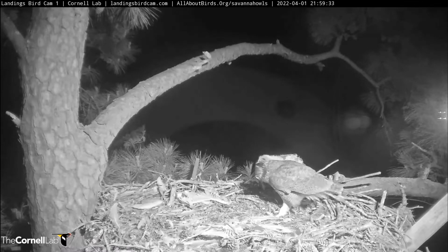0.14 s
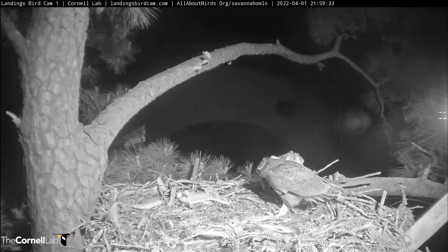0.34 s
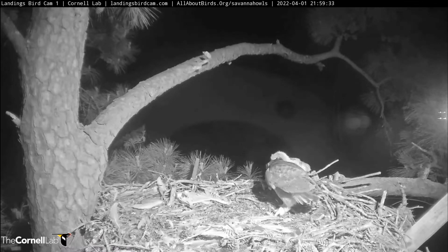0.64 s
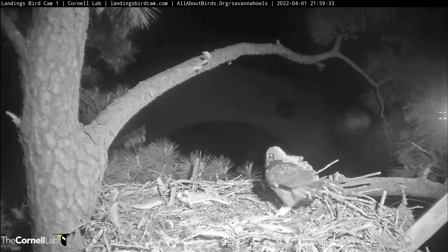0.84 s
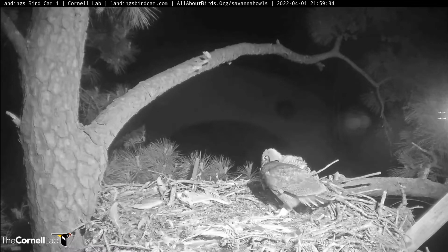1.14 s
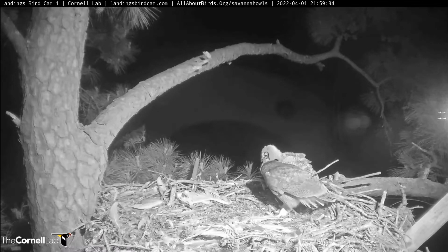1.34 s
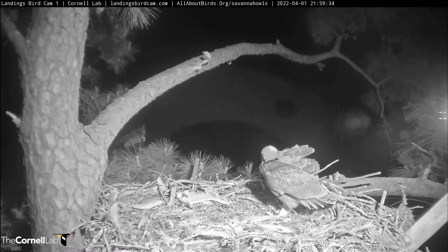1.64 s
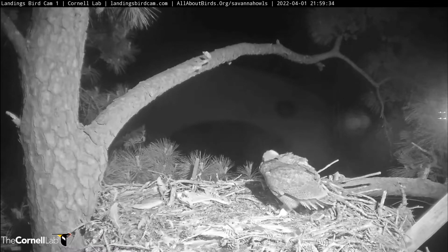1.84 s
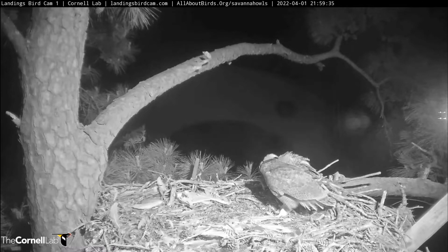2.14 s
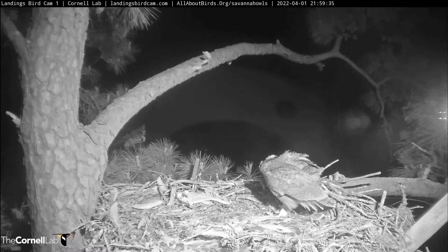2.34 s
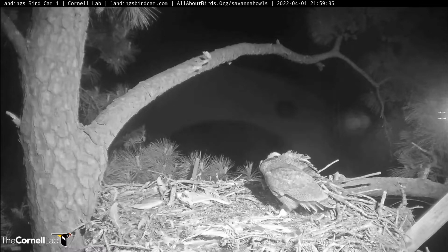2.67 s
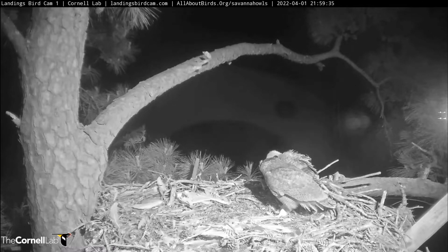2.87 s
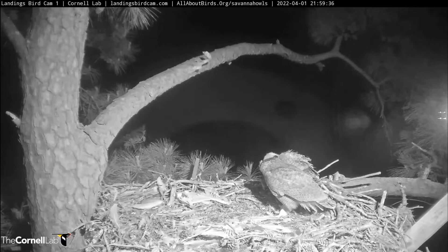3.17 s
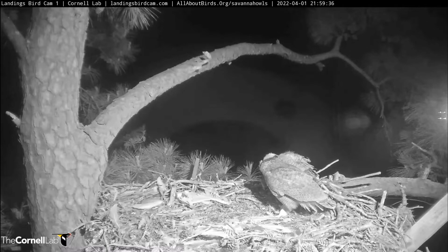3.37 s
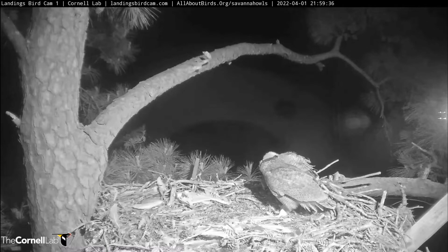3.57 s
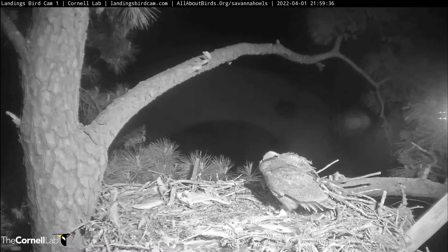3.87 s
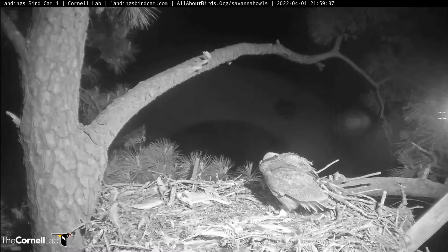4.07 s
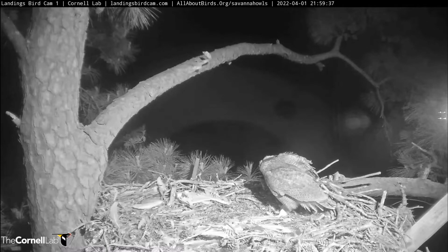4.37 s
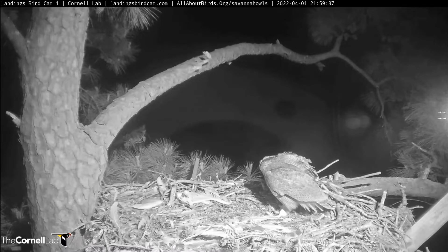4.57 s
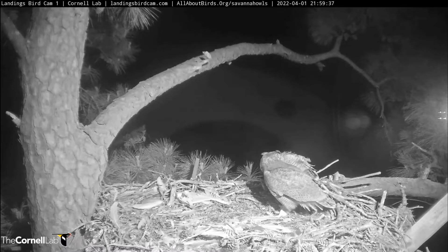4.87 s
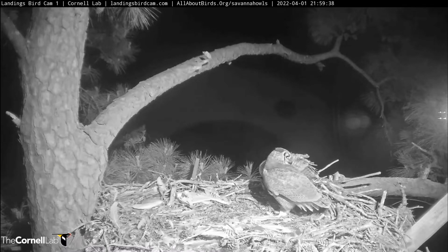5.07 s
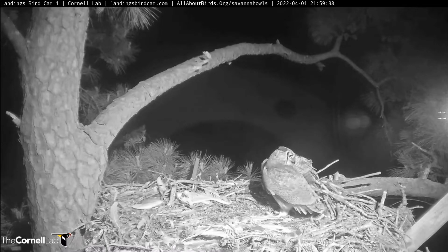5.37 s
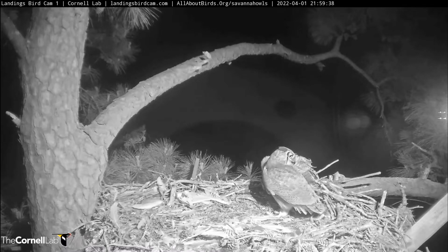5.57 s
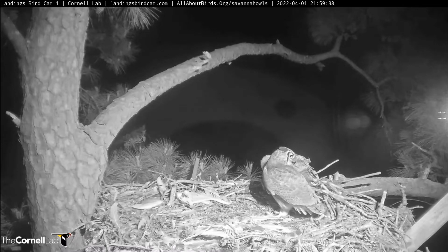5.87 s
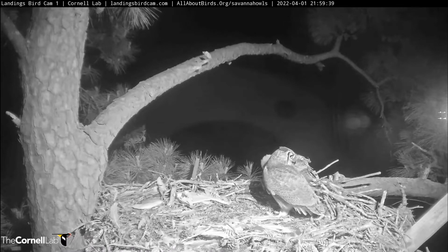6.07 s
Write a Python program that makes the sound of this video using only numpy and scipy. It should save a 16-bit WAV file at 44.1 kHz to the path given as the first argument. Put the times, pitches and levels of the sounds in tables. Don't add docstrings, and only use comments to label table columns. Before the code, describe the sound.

Three short, raspy begging screeches from a young owl, several seconds of quiet apart, over dim frog chorus, thin motor whine and electrical hum.

```python
import sys
import numpy as np
from scipy import signal
from scipy.fft import rfft, irfft
from scipy.io import wavfile
from scipy.ndimage import uniform_filter1d

SR = 44100
rng = np.random.default_rng(int(sys.argv[2]) if len(sys.argv) > 2 else 0)


def boost_factor(decibels):
    exponent = np.asarray(decibels, float) / 20
    return 10 ** exponent


def store_wav(level_fs):
    pcm = np.round(np.clip(np.atleast_2d(level_fs), -1, 1) * 32767)
    wavfile.write(sys.argv[1], SR, pcm.T.astype(np.int16))


N = 273861
BEAT_PEAK_S = 2.45


def rms_one(x):
    return x / np.sqrt(np.mean(np.abs(x) ** 2) + 1e-20)


def in_time(rows):
    s, *columns = np.transpose(rows)
    return [np.interp(np.arange(N) / SR, s, c) for c in columns]


def drift(rate_hz):
    r = np.exp(-2 * np.pi * rate_hz / SR)
    noise = rng.standard_normal(N + SR)
    return rms_one(signal.lfilter([1], [1, -2 * r, r * r], noise)[SR:])


def wobble(rate_hz):
    return rms_one(drift(rate_hz) + 1j * drift(rate_hz))


def coloured(spectrum):
    hz, level_db = np.transpose(spectrum)
    bins_hz = np.maximum(np.fft.rfftfreq(N, 1 / SR), 1)
    gain = boost_factor(np.interp(np.log(bins_hz), np.log(hz), level_db, right=-120))
    return rms_one(irfft(gain * rfft(rng.standard_normal(N)), N))


def ring(clicks, hz, t60):
    r, w = boost_factor(-60 / (t60 * SR)), 2 * np.pi * hz / SR
    return signal.lfilter([0, np.sin(w)], [1, -2 * r * np.cos(w), r * r], clicks + 1e-18)


def struck(events, t60):
    out = np.zeros(N)
    for s, peak_db, hz in events:
        click = np.zeros(SR // 5)
        click[0] = boost_factor(peak_db)
        at = round(s * SR)
        out[at:at + len(click)] += ring(click, hz, t60)
    return out


def turns(hz):
    return 2 * np.pi * np.cumsum(hz) / SR


def fade_depth(start, end, attack_s, release_s):
    t = np.arange(N) / SR
    return np.clip(np.maximum(1 - (t - start) / attack_s, 1 - (end - t) / release_s), 0, 1)


def owl():
    # [start/s, end of low whistle/s, its level/dB, breathy share at start/0-1,
    # hoarseness when whistle and hiss balance/0-1]
    calls = [
        (0.774, 1.252, -44, .2, 0.26),
        (3.375, 3.826, -41.5, 0.54, 0.58),
        (6.078, 6.26, -39.5, 0.98, .7),
    ]
    # [t/s, f/Hz]
    low_pitch = [
        [(.8, 946.7), (.824, 1075), (.864, 1143), (1.068, 1216), (1.162, 1254), (1.192, 1106), (1.214, 1044),
         (1.25, 1038)],
        [(3.396, 907), (3.426, 980), (3.486, 1049), (3.624, 1073), (3.77, 1045), (3.798, 1012), (3.824, 948.3)],
        [(6.083, 940), (6.14, 955), (6.185, 1030), (6.21, 1045)],
    ]
    # [t/s, f/Hz, breath effort/dB, whistle against hiss/dB]
    high_voice = [
        [(.777, 2240, -47, 16.5), (.787, 2786, -46.5, 8), (.808, 3346, -46, -1.5), (.88, 3404, -48, -2.5),
         (1.0, 3258, -42.5, 8.5), (1.05, 3333, -44.5, 8), (1.09, 3805, -46.5, -2), (1.168, 3930, -48.5, 0),
         (1.245, 2610, -53, -6)],
        [(3.378, 2270, -48.5, 17), (3.39, 2836, -47.5, -11), (3.41, 3620, -46.5, -8), (3.45, 4020, -49.5, -8),
         (3.54, 4012, -53, -20), (3.65, 3930, -48, 1), (3.793, 3800, -50.5, -1), (3.818, 2780, -47, 7),
         (3.85, 2150, -55, 6)],
        [(6.08, 2950, -55.5, -11), (6.13, 2890, -55, -5.5), (6.148, 2857, -52, 1), (6.165, 3488, -52.5, -18),
         (6.24, 3520, -58, -5)],
    ]
    air = rasp()
    return strands() + sum(screech(*rows, air) for rows in zip(calls, low_pitch, high_voice))


def screech(call, low_rows, high_rows, air):
    start, low_end, level_db, breathy, hoarse = call
    high_end = high_rows[-1][0]
    low_hz, = in_time(low_rows)
    high_hz, effort_db, whistle_db = in_time(high_rows)
    t = np.arange(N) / SR
    since = t - start
    sounding = 1 - fade_depth(start - .002, max(low_end, high_end) + .006, .004, .004)

    low_fade = fade_depth(start, low_end, attack_s=.017 + .059 * breathy, release_s=.029)
    crop_db = -.0495 * np.maximum(low_hz - 1110, 0)
    falling = uniform_filter1d(np.maximum(-np.gradient(low_hz) * SR / 1000, 0), size=400)
    low_db = level_db - 9 * since - 19 * low_fade + crop_db - falling
    low_phase = turns(low_hz + 9.2 * drift(53))
    unsettled = .12 + breathy * np.exp(-(np.maximum(since, 0) / .054) ** 2) + .1 * falling
    steady = np.sqrt(1 - np.minimum(unsettled, 1) ** 2)
    low = (steady + unsettled * wobble(120)) * np.exp(1j * low_phase)
    low = np.sqrt(2) * boost_factor(low_db) * np.real(low + boost_factor(-28) * low ** 2)

    pop_s, rise_s, decay_s = .7848, .0022, .0045
    pop = np.exp(-np.abs(t - pop_s) / np.where(t < pop_s, rise_s, decay_s))
    high_fade = fade_depth(start, high_end, attack_s=.007, release_s=.022)
    upper_db = effort_db + 14.5 * pop - 15.5 * high_fade

    hoarse = np.clip(hoarse + .03 * whistle_db, 0, 1)
    high_phase = turns(high_hz + 38 * drift(55))
    high = (np.sqrt(1 - hoarse ** 2) + hoarse * wobble(150)) * np.exp(1j * high_phase)
    high = high * boost_factor(1.8 * drift(45) - .4)

    beak_db = -.012 * np.maximum(high_hz + low_hz - 4530, 0)
    sum_db = -14 - .16 * whistle_db + beak_db
    difference_db = np.minimum(-16.5 - 1.1129 * whistle_db, -4)
    blur = rms_one(1 + .7 * wobble(70))
    sum_tone = boost_factor(sum_db) * np.exp(1j * low_phase)
    difference_tone = boost_factor(difference_db) * np.exp(-1j * low_phase)
    shaken = 1 + blur * (sum_tone + difference_tone)
    whistle = np.sqrt(2) * np.real(high * shaken + boost_factor(-33.5) * wobble(200) * high ** 2)

    skirt = np.sqrt(2) * np.real(wobble(520) * np.exp(.93j * high_phase))
    haze = np.sqrt(2) * np.real(wobble(300) * np.exp(1j * (high_phase + low_phase)))
    hiss = .77 * air + .38 * skirt + boost_factor(-16 + beak_db) * haze
    ratio = boost_factor(whistle_db) ** 2
    share = ratio / (1 + ratio)
    upper = boost_factor(upper_db) * (np.sqrt(share) * whistle + np.sqrt(1 - share) * hiss)
    return sounding * (low + upper)


def strands():
    # [start/s, end/s, first f/Hz, last f/Hz, level/dB]
    glides = [(.805, .83, 2500, 2760, -60), (.84, 0.924, 3900, 3000, -59), (.86, .94, 2400, 2340, -62.5),
              (.9, 1.1, 2800, 2900, -56.5), (1.075, 1.197, 2503, 2660, -55.5), (1.07, 1.2, 2700, 3030, -58),
              (1.09, 1.22, 3370, 3430, -52), (3.39, 3.48, 2600, 2800, -58), (3.4, 3.44, 3650, 3810, -57),
              (3.5, 3.623, 2450, 2700, -62), (3.541, 3.689, 3400, 3290, -62),
              (3.57, 3.799, 2806, 3050, -57.5), (3.712, 3.81, 4196, 4230, -63),
              (6.08, 6.13, 3250, 3100, -62), (6.15, 6.209, 3550, 3600, -60)]
    out, swing = np.zeros(N), wobble(45)
    shifts = rng.integers(0, N // 2, len(glides))
    for (start, end, first_hz, last_hz, level_db), shift in zip(glides, shifts):
        a, b = round(start * SR), round(end * SR)
        unsteady = rms_one(.68 + swing[shift:shift + b - a])
        tone = unsteady * np.exp(1j * turns(np.linspace(first_hz, last_hz, b - a)))
        out[a:b] += np.sqrt(2) * boost_factor(level_db) * signal.windows.tukey(b - a, .5) * tone.real
    return out


def rasp():
    # [f/Hz, level/dB per Hz]
    throat_hiss = [(880, -39), (1500, -15.5), (2040, -11), (2240, -16), (2640, -3), (3520, -8.5),
                   (4990, -23.5), (6480, -25.5), (7200, -45), (9360, -74.5), (15800, -120)]
    # [f/Hz, level/dB]
    throat_modes = [(2300, -9.5), (2620, -6.5), (2780, 0.5), (2950, 4.5), (3120, -3.5), (3270, 3),
                    (3450, -4), (3660, -2), (4250, -24), (4700, -18)]
    modes = 0
    for hz, level_db in throat_modes:
        mode = rms_one(ring(rng.standard_normal(N), hz, .027))
        modes = modes + boost_factor(level_db + 2.63 * drift(6.4)) * mode
    return rms_one(boost_factor(-8) * coloured(throat_hiss) + rms_one(modes))


def nest():
    # [t/s, peak level/dB, f/Hz]
    twigs = [(0.564, -48, 3620), (0.5754, -50, 4060), (0.5876, -59.5, 4530), (0.665, -61, 3800),
             (0.6937, -47.5, 4580), (2.3402, -47, 3560), (2.359, -48, 3740), (2.3944, -52.5, 3730),
             (2.835, -49, 3430), (5.4435, -55.5, 4140)]
    # [t/s, peak level/dB, f/Hz]
    thumps = [
        (2.358, -49.5, 766),
        (2.372, -62, 693),
        (2.96, -53, 722),
    ]
    # [start/s, end/s, level/dB]
    rustle = [
        (2.308, 2.441, -61),
        (2.467, 2.54, -66),
    ]
    feathers = coloured([(300, -5), (800, 2), (1800, -5), (3500, -1), (5000, -8.5), (7000, -24)])
    strokes = 0
    for start, end, level_db in rustle:
        fade = fade_depth(start, end, .036, .036)
        strokes = strokes + boost_factor(level_db - 29 * fade) * (fade < 1)
    brush = strokes * boost_factor(2.6 * drift(86)) * feathers
    return brush + struck(twigs, t60=.006) + struck(thumps, t60=.09)


def frogs():
    # [t/s, level/dB, share of deep-voiced frogs/dB]
    chorus = [(0, -56.5, -9), (.7, -60.5, -10), (1.6, -58.5, -12.5), (2.25, -60, -10.5),
              (2.37, -57.5, -4.5), (2.55, -60, -3.5), (3.0, -57, -9.5), (3.3, -59.5, -5), (4.3, -59, -10.5),
              (4.9, -58, -6), (5.2, -59.5, -12), (5.7, -59.5, -11.5), (6.21, -57.5, -16)]
    # [f/Hz, level/dB]
    frog_pitches = [(720, -11.5), (780, -9.5), (830, -1.5), (900, -6), (950, -2), (1005, 2.5), (1060, 0),
                    (1110, -3.5), (1190, -13.5), (1280, -11.5)]
    level_db, deep_db = in_time(chorus)
    out = 0
    for hz, frog_db in frog_pitches:
        croaks = (rng.random(N) < 70 / SR) * rng.uniform(-1.03, 1, N)
        croaks = croaks + .014 * rng.standard_normal(N)
        voice = rms_one(ring(ring(croaks, hz, .05), hz, .05)) * boost_factor(frog_db + 1.2 * drift(2.5))
        out = out + voice * (boost_factor(deep_db + 6) if hz < 870 else 1)
    return boost_factor(level_db) * rms_one(out)


def motor():
    # (f/Hz, level/dB rms)
    base = (118.36, -75)
    # [f/Hz, level/dB rms]
    partials = [(349.9, -83.5), (468.3, -79.5), (586.8, -79), (1071, -70), (1190, -77), (1766, -82.5),
                (1895, -83.5), (2013, -85), (2137, -87), (2250, -83.5), (2369, -74), (2487, -90.5),
                (2842, -64), (3047, -83), (3160, -77), (3198, -78), (3316, -76.5), (3634, -89),
                (4124, -84.5), (4522, -92), (6428, -101)]
    # [t/s, share of usual speed]
    shaft = [(0, .9985), (3.3, .9985), (4.3, .9993), (5.6, 1.0007), (6.21, 1.0003)]
    speed, = in_time(shaft)
    phase = turns(speed)
    phase = phase - phase[round(BEAT_PEAK_S * SR)]
    waver_db = 1.3 * drift(3.3)
    out = 0
    for k, (hz, level_db) in enumerate([base, *partials]):
        level = boost_factor(level_db + np.roll(waver_db, k * 9000))
        out = out + np.sqrt(2) * level * np.sin(hz * phase + k * rng.uniform(0, 6.36))
    return out


def night_air():
    # [f/Hz, level/dB per Hz]
    spectrum = [(20, -1.5), (90, -0.5), (200, -5.5), (600, -8), (1400, -6.5), (2000, -12.5), (2700, -7),
                (3300, -8), (3800, -14.5), (4500, -12.5), (5100, -22.5), (6500, -25), (7200, -24),
                (7800, -36)]
    return boost_factor(-62.5 + .5 * drift(4)) * coloured(spectrum)


def ducking(calls):
    duck_db, full_duck_at_db, recover_s = -7.5, -46, .23
    power = np.maximum(uniform_filter1d(calls ** 2, 600), 0)
    level = np.sqrt(power + 1e-18)
    loud = np.clip(level / boost_factor(full_duck_at_db), 0, 1)
    t = np.arange(N) / SR / recover_s
    held = np.exp(np.maximum.accumulate(np.log(loud) + t) - t)
    return boost_factor(duck_db * uniform_filter1d(held, 900))


def mains_hum():
    # [f/Hz, level/dB rms]
    mains = [
        (60, -64),
        (120, -74),
        (180, -86),
    ]
    t = np.arange(N) / SR - BEAT_PEAK_S
    return sum(np.sqrt(2) * boost_factor(level_db) * np.sin(2 * np.pi * hz * t) for hz, level_db in mains)


def chain_hiss(dry):
    hiss = boost_factor(-95.5) * (rng.standard_normal(N) + .2 * rng.standard_normal((2, N)))
    loud = uniform_filter1d(dry[0] ** 2, 2000) > boost_factor(-50) ** 2
    return hiss * np.where(loud, .45, 1)


def glitches():
    # [t/s, peak level/dB]
    events = [
        (3.385, -80),
        (3.394, -60),
        (3.401, -78),
        (3.408, -70),
    ]
    return struck([(s, peak_db, 9000) for s, peak_db in events], t60=.0012)


def scene():
    calls = owl()
    night = nest() + frogs() + motor() + night_air()
    mono = calls + ducking(calls) * night
    return np.array([mono, mono])


def roll_off(x):
    return signal.sosfilt(signal.butter(12, 15700, fs=SR, output="sos"), x)


def record(dry):
    link = signal.sosfilt(signal.cheby2(10, 45, 7900, fs=SR, output="sos"), dry)
    offset = .00097
    mix = link + mains_hum() + chain_hiss(dry) + glitches() + offset
    return roll_off(mix)


dry = scene()
out = record(dry)
store_wav(out)
```